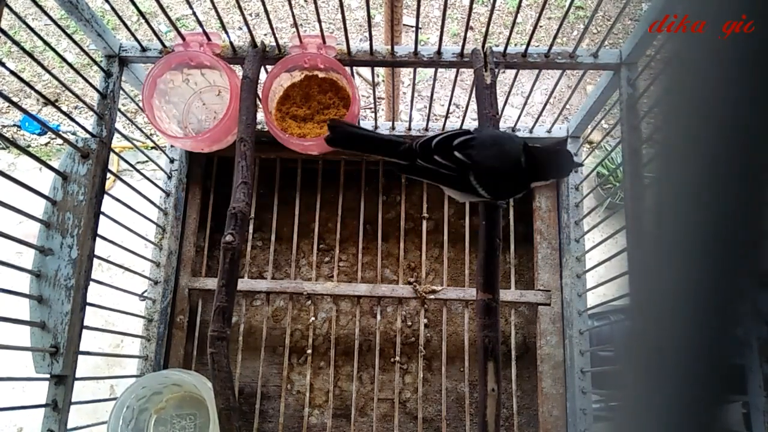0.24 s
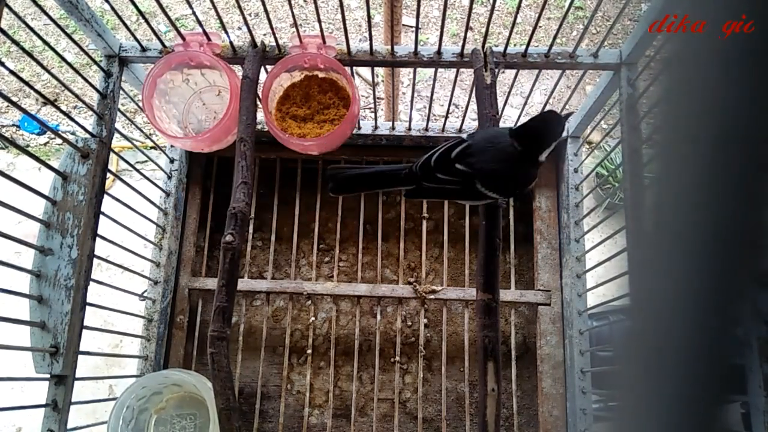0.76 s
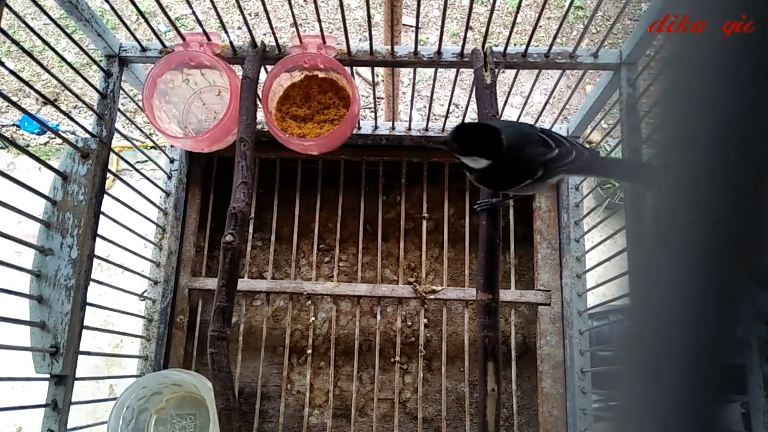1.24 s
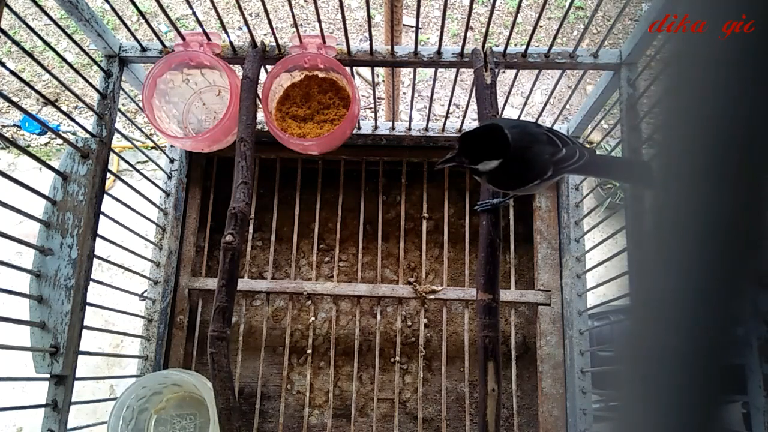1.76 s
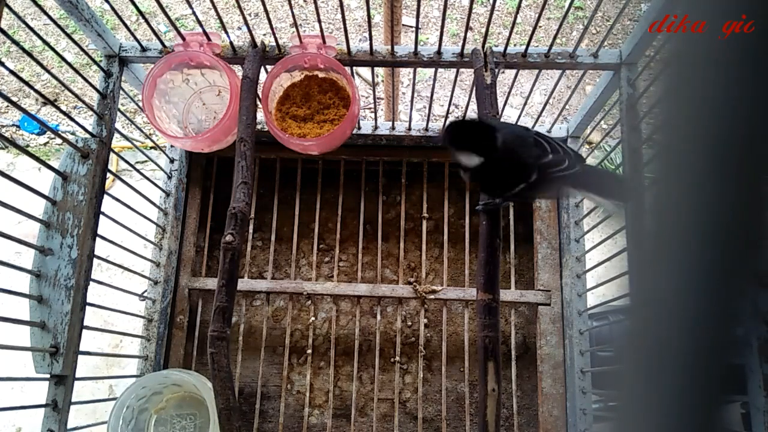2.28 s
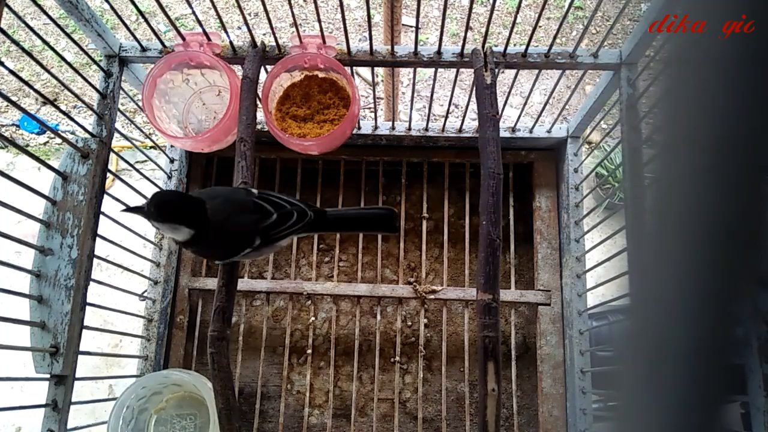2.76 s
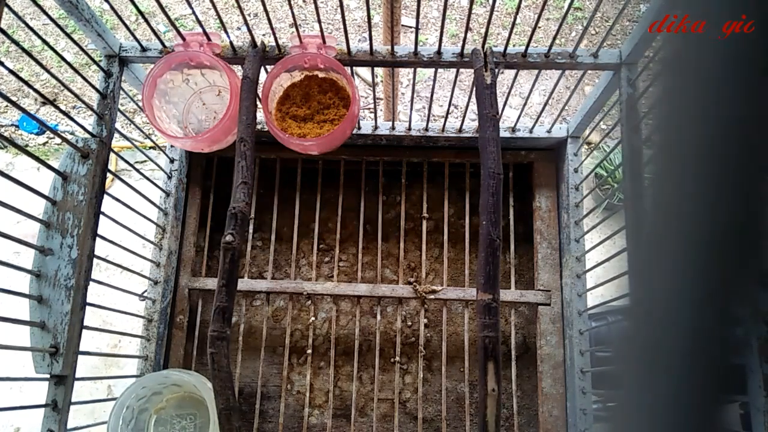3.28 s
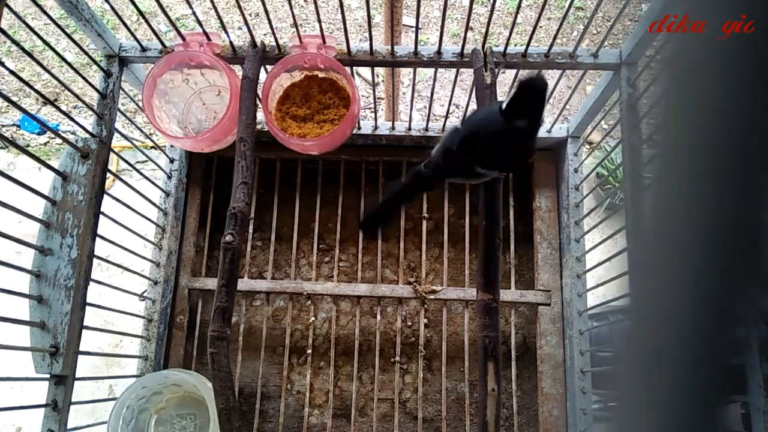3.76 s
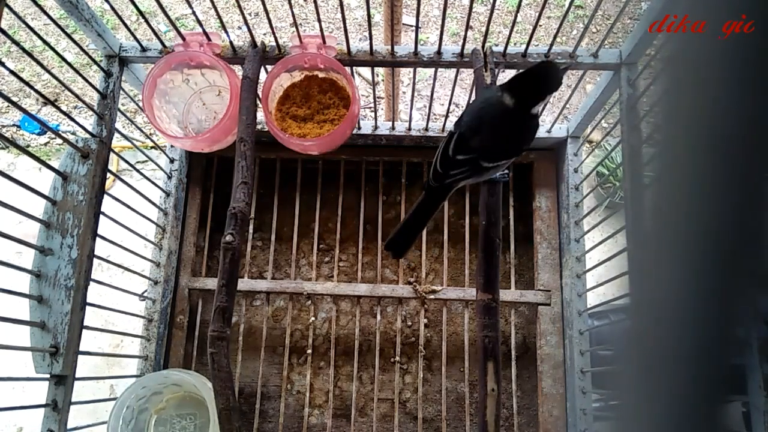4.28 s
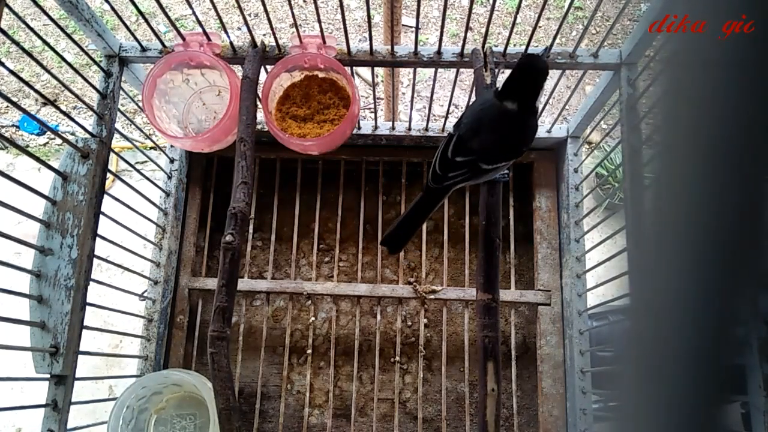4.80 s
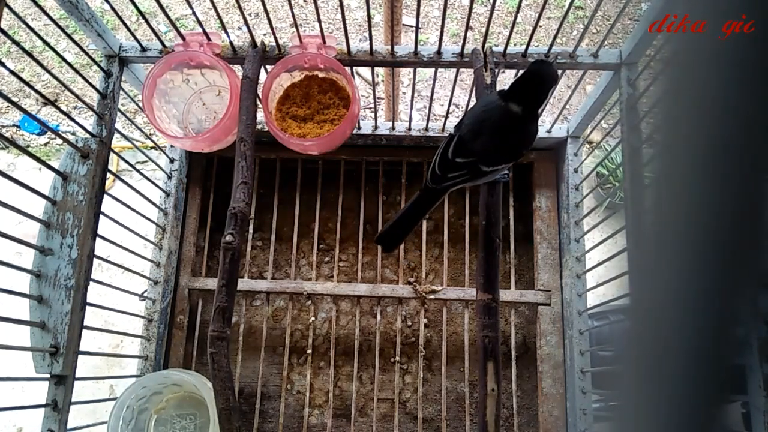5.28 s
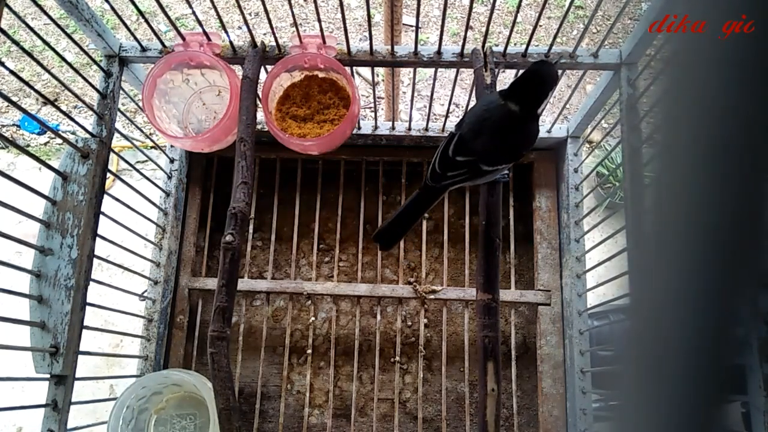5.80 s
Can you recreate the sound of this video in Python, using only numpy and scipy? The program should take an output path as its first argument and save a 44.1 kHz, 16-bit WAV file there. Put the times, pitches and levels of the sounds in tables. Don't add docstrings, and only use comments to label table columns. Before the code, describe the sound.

A small caged bird whistles two short bursts of piercing chirps and rising glides over faint hiss and dull distant traffic murmur.

```python
import sys
import numpy as np
from scipy import signal
from scipy.io import wavfile
from scipy.ndimage import uniform_filter1d, map_coordinates

SR = 44100
rng = np.random.default_rng(int(sys.argv[2]) if len(sys.argv) > 2 else 0)


def nominal_scale(level):
    x = np.asarray(level, float) / 20
    return 10 ** x


def dump(signal):
    limited = np.clip(np.atleast_2d(signal).T, -1, 1)
    pcm = np.round(limited * 32767).astype(np.int16)
    wavfile.write(sys.argv[1], SR, pcm)


N = 266628


def rms_one(x):
    return x / np.sqrt(np.mean(x ** 2) + 1e-20)


def drift(hz):
    r = np.exp(-16 * np.pi * hz / SR)
    settle = 4000
    white = rng.standard_normal(N // 8 + 2 + settle)
    slow = signal.lfilter([1], [1, -2 * r, r * r], white)[settle:]
    return np.interp(np.arange(N) / 8, np.arange(len(slow)), rms_one(slow))


def band(x, low_hz, high_hz):
    edges_hz = [low_hz, min(high_hz, .47 * SR)]
    return signal.sosfilt(signal.butter(2, edges_hz, "band", fs=SR, output="sos"), x)


def coloured(spectrum, patchy_db, patch_hz):
    hz, db = np.transpose(spectrum)
    edges = hz[0] * 2 ** np.arange(0, np.log2(hz[-1] / hz[0]) + .1, 1 / 4)
    white = rng.standard_normal((2, N))
    out = 0
    for k, (low, high) in enumerate(zip(edges, edges[1:])):
        level_db = np.interp(np.log(low * high) / 2, np.log(hz), db)
        level_db = level_db + patchy_db * drift(patch_hz)
        out = out + nominal_scale(level_db) * band(white[k % 2], low, high)
    return rms_one(out)


def swells(rows, rest_db, edge=1):
    t = np.arange(0, N + 64, 64) / SR
    power = nominal_scale(2 * rest_db)
    for s, db, rise_s, fall_s in rows:
        away = np.where(t < s, (s - t) / rise_s, (t - s) / fall_s)
        power = power + nominal_scale(2 * (db - 20 * away ** edge))
    return np.interp(np.arange(N) / SR, t, np.sqrt(power))


# (frequency [Hz], level per hertz [dB])
MURMUR_SPECTRUM = [(350, -14), (700, -6.5), (900, -1.5), (1050, -7.5), (1300, -8.5), (1600, -12),
                   (1950, -9), (2300, -14.5), (2700, -24), (3400, -35.5), (5600, -40)]
# (time [s], level [dB])
TRAFFIC_LEVEL = [(0.0, -56.5), (.28, -57.5), (.34, -62), (.42, -58), (.62, -57.5), (1.3, -58.5),
                 (1.38, -52.5), (1.7, -59), (2.2, -56), (2.56, -55), (2.75, -59), (3.02, -58), (3.2, -64),
                 (3.3, -58.5), (4.6, -58.5), (5.2, -56), (5.8, -63), (6.05, -59)]


def traffic_murmur():
    level_db = np.interp(np.arange(N) / SR, *np.transpose(TRAFFIC_LEVEL))
    return nominal_scale(level_db + 0.59) * coloured(MURMUR_SPECTRUM, patchy_db=2.97, patch_hz=15.0)


# (peak time [s], level [dB], rise [s], fall [s])
HUM_SWELLS = [(0.0, -65, .1, .4), (.252, -63, .15, .3), (.49, -58, .2, .25), (.7, -61, .09, 2),
              (1.2, -61, 2, .1), (1.37, -51, .12, .8), (2.1, -60, .3, .4), (2.62, -63.5, .12, .3),
              (3.05, -59.5, .22, .25), (3.272, -54.5, .07, .4), (3.812, -62.5, .35, .2),
              (3.98, -61.5, .15, .4), (5.1, -61, .4, .6), (5.4, -57.5, .5, .3), (5.65, -63, .3, .6),
              (6.04, -59, .25, .1)]


def low_hum():
    lower = band(rng.standard_normal(N), 146.2, 218)
    upper = band(rng.standard_normal(N), 255, 335)
    return nominal_scale(-1.4) * swells(HUM_SWELLS, rest_db=-77) * rms_one(lower + nominal_scale(-2.5) * upper)


# (peak time [s], level [dB], rise [s], fall [s])
FRAME_THUMPS = [(.08, -77, .3, .3), (.398, -72, .17, .35), (.812, -71.5, .25, 1.2), (1.49, -70, .25, 2),
                (2.552, -72, .06, .25), (3.05, -75, .25, .6), (3.272, -63, .1, .12), (3.524, -73, .12, .13),
                (3.812, -66.5, .28, .17), (4.25, -70, .9, .5), (4.8, -71, .3, .3), (5.11, -69, .3, .07),
                (5.53, -73, .2, .1), (5.732, -69.5, .05, .4)]


def frame_thumps():
    rumble = rms_one(band(rng.standard_normal(N), 45, 115))
    return nominal_scale(4.84) * swells(FRAME_THUMPS, rest_db=-87) * rumble


# (centre [Hz], width [Hz], level [dB])
AIR_RESONANCES = [(460.3, 56, 0), (596.7, 64, 1.5), (647, 170, -9.5)]
# (peak time [s], level [dB], rise [s], fall [s])
DRONE_SWELLS = [(.028, -56, .15, .4), (.28, -63, .4, .3), (.576, -53, .25, .12), (1.11, -50, .12, .2),
                (1.49, -54, .4, .5), (1.864, -61, .05, .1), (2.604, -57.5, .19, .23), (2.9, -61, .04, 1),
                (3.004, -53, .05, .2), (3.812, -60, .9, .13), (3.97, -56, .12, .3), (4.86, -55, 1.2, .08),
                (4.922, -50.5, .05, .17), (5.19, -59, .9, 1.2), (5.55, -59, .5, .6)]


def hollow_drone():
    white = rng.standard_normal((len(AIR_RESONANCES), N))
    ringing = 0
    for (hz, width, db), noise in zip(AIR_RESONANCES, white):
        mode = rms_one(band(noise, hz - width / 2, hz + width / 2))
        ringing = ringing + nominal_scale(db + 3.8 * drift(5.0)) * mode
    return swells(DRONE_SWELLS, rest_db=-69) * rms_one(ringing)


# (frequency [Hz], level per hertz [dB])
RUSTLE_SPECTRUM = [(1760, -26.5), (3000, -2), (5250, -7), (6460, -5.5), (8280, -1), (10800, -4),
                   (13700, -3), (14200, -6)]
# (peak time [s], level [dB], rise [s], fall over 20 dB [s])
FEATHER_STIRS = [(0.0, -70, .1, .14), (.208, -67.5, .1, .13), (.53, -74.5, .25, .14), (.7, -75, .03, .15),
                 (1.048, -76.5, .55, .4), (1.28, -75, .02, .9), (1.47, -68, .2, 1.2), (2.2, -67, 1.0, .6),
                 (2.69, -71, .3, .12), (2.87, -73.5, .06, .2), (3.18, -84, .012, .08),
                 (3.31, -75, .035, .26), (3.6, -81, .02, .4), (3.762, -70, .16, .2), (3.91, -72, .3, .3),
                 (4.37, -66, .32, 1.1), (5.185, -67, 1.0, .45), (5.59, -71.5, .25, .1),
                 (5.87, -74, .015, .5), (5.98, -71, .06, .15)]


def feather_rustle():
    stir = swells(FEATHER_STIRS, rest_db=-92, edge=1.6)
    rubbing = coloured(RUSTLE_SPECTRUM, patchy_db=3.3, patch_hz=15.0)
    rustle = nominal_scale(3.5 + 2.5 * drift(14.0)) * stir * rubbing
    return signal.sosfilt(signal.ellip(6, .5, 13, 14350, fs=SR, output="sos"), rustle)


# (time [s], peak level [dB], centre [Hz])
CLAW_TICKS = [(0.5994, -63, 4800), (0.6948, -63.5, 8350), (0.9194, -63.5, 8900), (1.271, -50, 12800),
              (1.3608, -52.5, 12100), (1.414, -54.5, 4710), (1.4494, -54, 5400), (2.7252, -52, 8530),
              (3.2912, -52, 3600), (3.3044, -58, 3090), (3.3244, -61, 3720), (3.7095, -55, 8860),
              (3.7626, -53.5, 13530)]


def ticks():
    out, t = np.zeros(N), np.arange(2000) / SR
    for (s, db, hz), noise in zip(CLAW_TICKS, rng.standard_normal((len(CLAW_TICKS), 2000))):
        envelope = np.exp(-t / 0.0057) * (1 - np.exp(-t / .0015))
        burst = band(noise, .75 * hz, 1.2 * hz) * envelope
        out[int(s * SR):int(s * SR) + 2000] += nominal_scale(db) * burst / np.abs(burst).max()
    return out


NEAR_T60_S, NEAR_DB, NEAR_RISE_S = .12, -12.5, .006
ROOM_T60_S, ROOM_DB, ROOM_RISE_S = .37, -21.5, .03
CAGE_DB = -18.5


def room(x):
    t = np.arange(int(.6 * SR)) / SR
    answer = np.zeros(len(t))
    for t60, db, rise_s in (NEAR_T60_S, NEAR_DB, NEAR_RISE_S), (ROOM_T60_S, ROOM_DB, ROOM_RISE_S):
        tail = rng.standard_normal(len(t)) * nominal_scale(-60 * t / t60) * np.clip(t / rise_s, 0, 1)
        answer += nominal_scale(db) * tail / np.sqrt(np.sum(tail ** 2))
    echo_s = np.array([.0017, .0031, .0058, .0092])
    answer[(echo_s * SR).astype(int)] += nominal_scale(CAGE_DB) * np.array([0.2, -0.45, 0.53, -1.2])
    wet = signal.fftconvolve(x, answer)[:N] * nominal_scale(1.5 * drift(70.0))
    shifting = np.arange(N) + 1.1 * drift(160.0)
    return map_coordinates(wet, [shifting], order=3)


# (start [s], end [s], last pulse rate [Hz], throat resonance [Hz], level [dB])
LEAD_INS = [(1.497, 1.528, 1340, 4400, -35), (1.958, 1.99, 2427, 4500, -30),
            (2.047, 2.076, 2863, 4800, -25), (2.068, 2.104, 1600, 5770, -37),
            (2.209, 2.236, 1390, 5000, -34), (2.231, 2.241, 2200, 5400, -33),
            (4.389, 4.403, 2300, 4200, -29.5), (4.475, 4.502, 2527, 4300, -28),
            (4.633, 4.671, 1430, 4300, -30.5), (5.196, 5.22, 2192, 3700, -31),
            (5.288, 5.308, 2102, 3800, -29)]
BUZZ_REST_HZ, BUZZ_START_SHARE = 430, .45


def buzzes():
    out, shaky, sputter = np.zeros(N), drift(500.0), drift(300.0)
    for t0, t1, last_hz, throat_hz, db in LEAD_INS:
        first_hz = BUZZ_REST_HZ + BUZZ_START_SHARE * last_hz
        on = slice(int(t0 * SR), int(t1 * SR))
        along = np.linspace(0, 1, on.stop - on.start)
        scratch = (last_hz / first_hz - 1) ** 2 + .03
        rate_hz = first_hz + (last_hz - first_hz) * (1 - (1 - along) ** 2.4)
        turn = 2 * np.pi * np.cumsum(rate_hz * (1 + .3 * scratch * shaky[on])) / SR
        pulses = sum(np.cos(k * turn) for k in range(1, 7))
        pulses = pulses * nominal_scale(3.5 * np.clip(sputter[on], -2.5, 1.2))
        swell = along ** 0.78 * signal.windows.tukey(len(along), .25)
        out[on] += nominal_scale(db) * swell * rms_one(band(pulses, 0.76 * throat_hz, 1.23 * throat_hz))
    return out


CREST_S, CREST_SHARE, KNEE_DB, CREST_DB = .005, 1.07, -2.5, -5
SHOULDER_S, SHOULDER_SHARE, SHOULDER_DB = .005, .96, -5


def arch(knee_s, knee_hz, end_s, end_hz, db):
    crest_s = end_s + CREST_S
    return [(knee_s, knee_hz, db + KNEE_DB),
            (end_s, end_hz, db),
            (crest_s, CREST_SHARE * end_hz, db + CREST_DB),
            (crest_s + SHOULDER_S, SHOULDER_SHARE * end_hz, db + SHOULDER_DB)]


DROP_DB, SCOOP_BOW = -16, .62


def framed(body, ends):
    s, hz, db = body[0]
    last_s, last_hz, last_db = body[-1]
    scoop_s, low, scoop_db, drop_s, fallen = ends
    start = (s - scoop_s, low * hz, db + scoop_db)
    halfway = (s - scoop_s / 2, hz * (low + SCOOP_BOW * (1 - low)), db + scoop_db * (1 - SCOOP_BOW))
    return [start, halfway, *body, (last_s + drop_s, fallen * last_hz, last_db + DROP_DB)]


# (time [s], pitch [Hz], level [dB])
RISING_NOTES = [
    [(1.534, 4660, -26.5), (1.539, 4223, -27), (1.544, 2982, -25), (1.548, 3305, -33.5),
     (1.568, 3830, -24.5), (1.592, 4020, -23.5), (1.650, 4340, -29.5), (1.665, 4710, -30.5),
     (1.671, 5600, -33)],
    [(2.245, 4634, -24), (2.250, 4550, -28), (2.258, 3130, -29.5), (2.285, 3500, -27.5),
     (2.300, 3740, -30.5), (2.330, 3990, -27), (2.352, 4030, -28), (2.381, 4760, -28), (2.393, 5320, -32.5)],
    [(4.672, 4260, -24.5), (4.682, 4050, -30), (4.686, 3460, -21.5), (4.690, 2884, -30), (4.702, 3392, -25),
     (4.728, 3760, -29), (4.755, 4149, -23.5), (4.803, 4248, -25.5), (4.822, 5150, -32)],
]
# (time [s], pitch [Hz], level [dB])
HELD_NOTES = [
    [(1.759, 6000, -26), (1.768, 6130, -24), (1.800, 6545, -29), (1.825, 6680, -34), (1.846, 6600, -38),
     (1.855, 6847, -24), (1.869, 7057, -26), (1.874, 7900, -38)],
    [(4.157, 6200, -31), (4.195, 6640, -37), (4.213, 6600, -36), (4.218, 5860, -38), (4.224, 6450, -34),
     (4.237, 6804, -33), (4.282, 6633, -34.5), (4.296, 7650, -27.5)],
    [(4.937, 6733, -35), (4.972, 6840, -34), (4.995, 6730, -34), (5.030, 6800, -35.5), (5.060, 7055, -26),
     (5.073, 7390, -28), (5.080, 7100, -35)],
]
# (knee time [s], knee pitch [Hz], end of climb [s], end pitch [Hz], level [dB])
ARCHED_CHIRPS = [
    (1.985, 5400, 2.003, 6250, -19.5),
    (2.074, 4900, 2.093, 6250, -22),
    (4.416, 5250, 4.437, 5990, -21.5),
    (4.502, 5050, 4.522, 6050, -21),
    (5.228, 5050, 5.248, 6400, -22),
    (5.317, 5200, 5.334, 5680, -24),
]
# (time [s], pitch [Hz], level [dB])
VOICE_FLICK = [
    (2.061, 4740, -28.5),
    (2.064, 6190, -29.5),
    (2.067, 5880, -36.5),
    (2.070, 6210, -13),
    (2.074, 6100, -22),
]
# (scoop [s], from share of pitch [1], scoop level [dB], drop [s], to share of pitch [1])
RISER_ENDS, HELD_ENDS = (.008, .68, -16, .010, .77), (.0095, .52, -20, .010, .74)
ARCH_ENDS, FLICK_ENDS = (.0135, .46, -26, .008, .66), (.005, .81, -7, .004, .97)
RISER_OCTAVE_DB, HELD_OCTAVE_DB, ARCH_OCTAVE_DB = -58, -45.5, -52


def notes():
    risers = [(framed(body, RISER_ENDS), RISER_OCTAVE_DB) for body in RISING_NOTES]
    held = [(framed(body, HELD_ENDS), HELD_OCTAVE_DB) for body in HELD_NOTES]
    arches = [(framed(arch(*row), ARCH_ENDS), ARCH_OCTAVE_DB) for row in ARCHED_CHIRPS]
    return risers + held + arches + [(framed(VOICE_FLICK, FLICK_ENDS), ARCH_OCTAVE_DB)]


BREATH_DB, FLUTTER_DB = -24, 1.2


def whistles():
    t, out = np.arange(N) / SR, np.zeros(N)
    waver, halo = drift(140.0), drift(860.0)
    for rows, octave_db in notes():
        s, hz, db = np.transpose(rows)
        on = slice(int(s[0] * SR), int(s[-1] * SR))
        glide = uniform_filter1d(np.interp(t[on], s, hz), size=60)
        turn = 2 * np.pi * np.cumsum(glide * (1 + .004 * waver[on])) / SR
        level_db = np.interp(t[on], s, db)
        tone = nominal_scale(level_db) * (1 + nominal_scale(BREATH_DB) * halo[on]) * np.sin(turn)
        octave = nominal_scale(octave_db + 0.27 * (level_db - db.max())) * np.sin(2 * turn)
        out[on] += np.sqrt(2) * (tone + octave) * signal.windows.tukey(len(tone), .04)
    return out * nominal_scale(FLUTTER_DB * drift(79.0) + 1.5)


# (time [s], depth [dB], width [ms])
DEEP_CATCHES = [(1.5449, -14, 3), (1.5599, -14, 1.9), (1.5892, -15, 1.8), (1.6062, -15, 2.7),
                (1.7863, -20, 1.6), (1.8477, -11, 2.7), (1.9788, -10.5, 4.1), (1.9876, -11, 2.7),
                (2.0065, -16, 2.6), (2.0677, -12.5, 3.9), (2.0815, -17, 1.8), (2.0989, -16, 1.8),
                (2.2915, -17, 1.4), (2.3327, -11, 2.9), (4.161, -15, 2.9), (4.176, -9, 5.3),
                (4.1866, -18, 1.2), (4.2624, -17, 2.3), (4.4203, -12.5, 2.2), (4.429, -12, 1.6),
                (4.5109, -10, 3.8), (4.5189, -13, 2), (4.6699, -15, 1.2), (4.6914, -14, 3.4),
                (5.0201, -15, 6.6), (5.0744, -17.5, 3.3), (5.2343, -12.5, 1.1), (5.2409, -13.5, 1.8),
                (5.2509, -15, 2.9), (5.3252, -12, 2.9)]
SMALL_GAP_S, SMALL_DB, SMALL_MS = .036, -8.5, 1.7


def catches():
    t, shading_db, small = np.arange(N) / SR, np.zeros(N), []
    for body in RISING_NOTES + HELD_NOTES:
        slots = np.arange(body[0][0], body[-1][0] - SMALL_GAP_S / 2, SMALL_GAP_S)
        for s, (u, v, w) in zip(slots, rng.random((len(slots), 3))):
            small.append((s + u * SMALL_GAP_S, SMALL_DB * (.7 + .6 * v), SMALL_MS * (.6 + w)))
    for s, db, ms in DEEP_CATCHES + small:
        near = slice(int((s - .01) * SR), int((s + .01) * SR))
        shading_db[near] += db / (1 + ((t[near] - s) / (.5e-3 * ms)) ** 2)
    return nominal_scale(shading_db)


def scene():
    background = traffic_murmur() + low_hum() + frame_thumps() + hollow_drone() + feather_rustle()
    bird = ticks() + buzzes() + whistles()
    return ((bird + room(bird)) * catches() + background)[None]


def top_cut(x):
    return signal.sosfilt(signal.butter(12, 15760, fs=SR, output="sos"), x)


def record(dry):
    up, down = 160, 147
    captured = signal.resample_poly(dry, up, down, axis=1)
    nearest = np.arange(N) * up // down
    topped = signal.sosfilt(signal.ellip(10, .3, 60, 15800, fs=SR, output="sos"), captured[:, nearest])
    return top_cut(topped)


dry = scene()
out = record(dry)
dump(out)
```